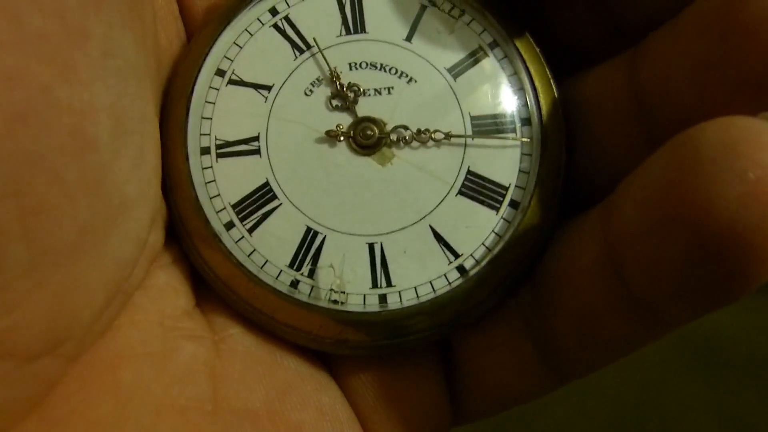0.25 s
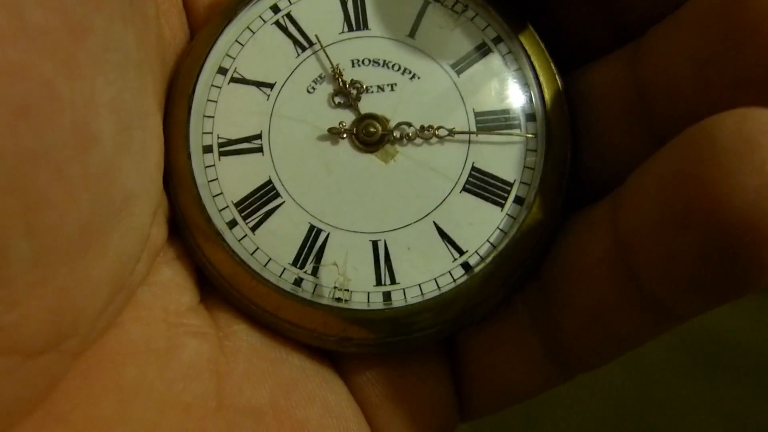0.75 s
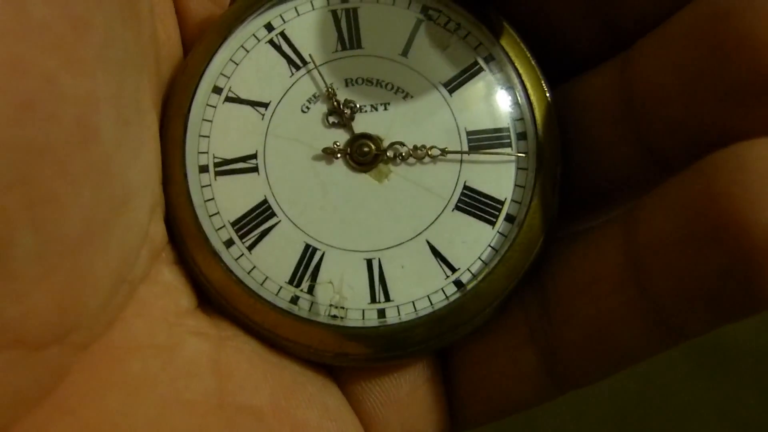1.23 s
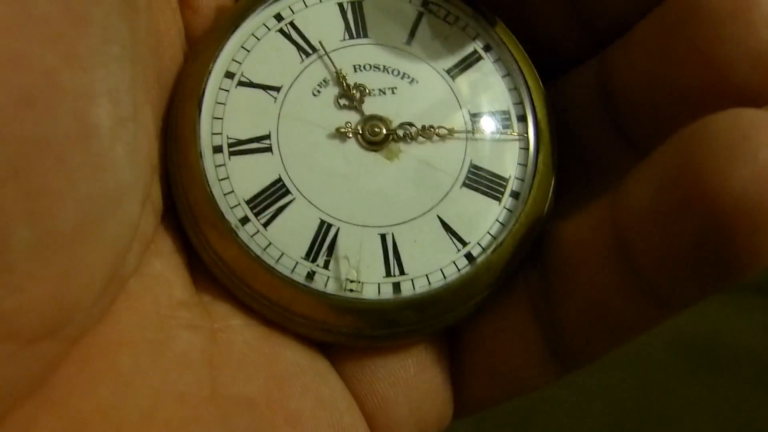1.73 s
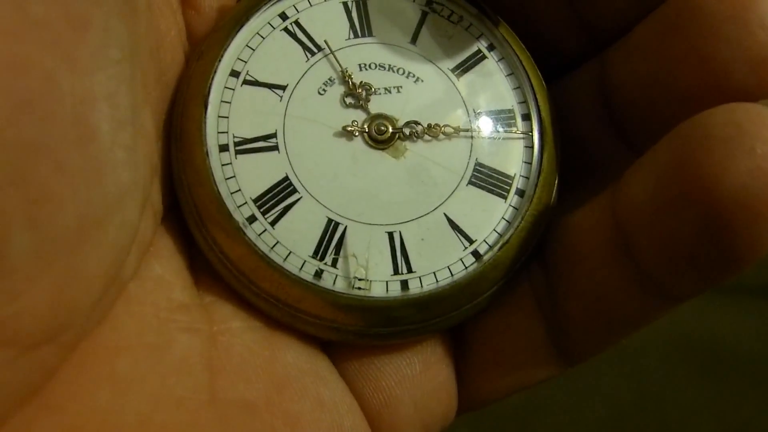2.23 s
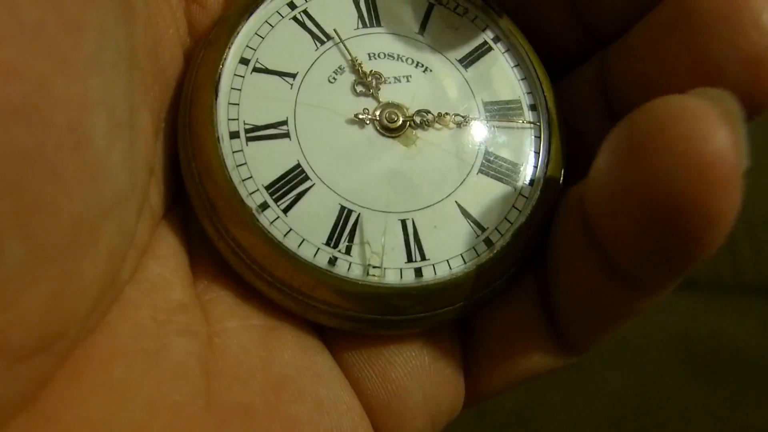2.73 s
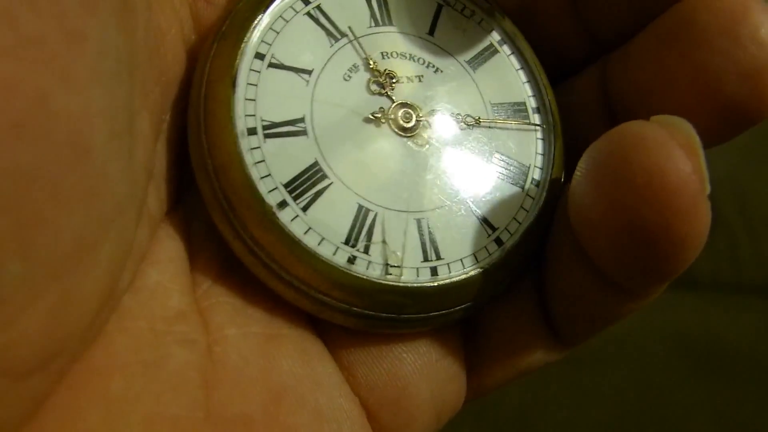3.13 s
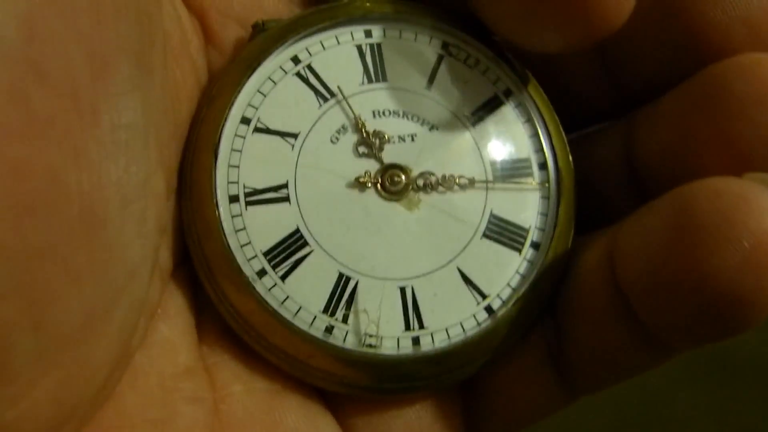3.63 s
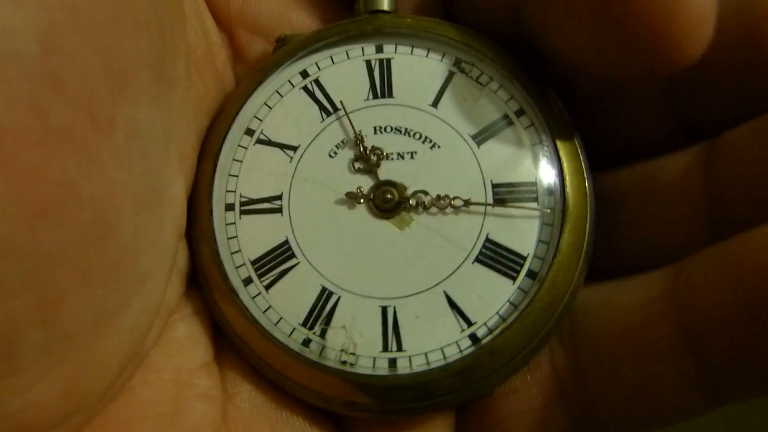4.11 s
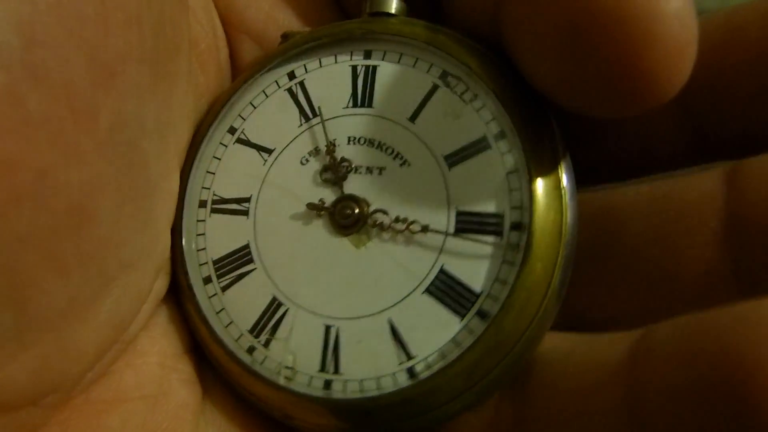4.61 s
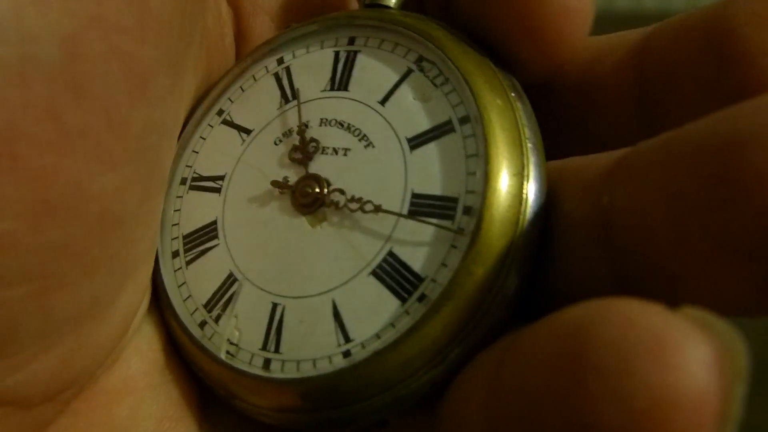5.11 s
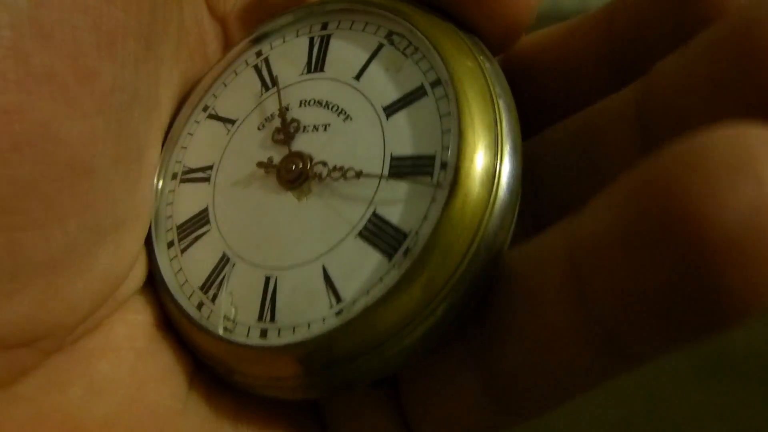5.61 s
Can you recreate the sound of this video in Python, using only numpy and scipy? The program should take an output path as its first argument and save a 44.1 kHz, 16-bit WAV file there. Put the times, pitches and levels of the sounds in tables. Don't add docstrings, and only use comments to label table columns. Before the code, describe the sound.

Crisp metallic watch ticking, almost five beats a second, over soft hiss and very faint distant clocks, after one sharp opening click.

```python
import sys
import numpy as np
from scipy import signal
from scipy.fft import rfft, irfft
from scipy.io import wavfile

SR = 44100
rng = np.random.default_rng(int(sys.argv[2]) if len(sys.argv) > 2 else 0)


def volts(x):
    e = np.asarray(x, float) / 20
    return 10 ** e


def to_wav(s):
    ch = np.atleast_2d(s).T
    pcm = np.round(np.clip(ch, -1, 1) * 32767)
    wavfile.write(sys.argv[1], SR, pcm.astype(np.int16))


N = 258426
MIDDLE_S = N / SR / 2
LEFT_RIGHT = np.array([[1.], [-1.]])

# (pitch [Hz], level [dB], time to fall 60 dB [s])
BACK_TONES = [(2371, -0.6, 0.012), (2350, -15, 0.014)]
# (share of the lid pitch [ratio], level [dB], time to fall 60 dB [s])
LID_TONES = [(1.0023, 2, 0.013), (1.04, -9.5, 0.015), (.96, -13.5, 0.029), (1.19, -19, 0.012)]
# (pitch [Hz], level [dB], time to fall 60 dB [s])
PLATE_TONES = [(4738, -2.5, 0.013), (4904, -9.5, 0.0099), (5340, -16, 0.01), (5720, -18, 0.02),
               (3676, -17.5, 0.0068), (4730, -31.5, 0.24)]
# (pitch [Hz], time to fall 60 dB [s], level on unlock [dB], on push [dB], on drop [dB])
STEEL_TONES = [(6540, 0.013, -6, -2.6, -13.5), (7140, 0.0041, 0, -5.5, -6), (7570, 0.0096, -6.5, -12, -5),
               (8210, 0.0095, -11, -22.5, -15), (8950, .01, -19, -13, -14), (10900, 0.015, -39, -16, -22.5),
               (12500, 0.0059, -24, -28, -34), (14800, .004, -26, -24, -36)]
# (build-up [s], left leads [rad], left minus right [dB], spread of both from blow to blow [0-1])
PART_PATHS = [
    (0.00052, 0.31, -0.3, 0),
    (0.00063, 0.51, 2, 0.03),
    (0.00086, 0.21, -1.5, 0.56),
    (0.00028, -0.37, -1, 0.51),
]
# (pitch [Hz], level [dB], time to fall 60 dB [s])
HAND_AIR_TONES = [(1547, -47.5, 0.03)]

# (drop time [s], unlock level [dB], lid [dB], plates [dB], steel [dB])
TICK_BEATS = [(0.1952, 0.5, 5.5, 1, 0), (0.6084, -0.5, -2.5, -1.0, 2.5), (1.0219, 2.5, -2.5, 1.5, -2.5),
              (1.4354, -0.5, -2.0, 2, 2), (1.8475, -2.5, -0.0, 0, 6.5), (2.2609, 5.5, -0.5, -0.5, -2),
              (2.6729, -0.0, 2.5, -4.0, 1.5), (3.0859, 4, 3, -1.5, -2), (3.5, -5.5, -0.5, -1.5, -1.5),
              (3.9122, -4.5, 0.0, 1.0, -5), (4.3247, -2.5, -6.5, 3, -2.5), (4.7376, 1, 0.5, 1.0, -2),
              (5.1509, 0.5, 0.0, 1, 1.5), (5.5633, 5.0, -1.5, 2.5, 5)]
# (drop time [s], unlock level [dB], lid [dB], plates [dB], steel [dB])
TOCK_BEATS = [(0.0005, 0.0, 0.0, 0.5, -4), (0.408, 4.5, 2.5, -3.5, 2), (0.8231, 1, 2.5, 2, -1),
              (1.235, -4, 0, 6.5, -2), (1.6491, -1.5, 0.5, -1.5, 1.0), (2.0622, 1, -2, -7, -1.0),
              (2.4761, -1.5, 4.5, -1.5, -0.5), (2.8887, -1, 5, -0.5, -1), (3.3026, 1.5, 4.0, -3, 0.5),
              (3.715, 0.5, -1.0, -0.5, 2.5), (4.1276, 1, -11, -0.0, 0.5), (4.541, 1, -5.5, 0.5, -3.5),
              (4.9549, 1, 2, 6, 1.5), (5.366, 0.5, 1, 5, -1), (5.7789, -0.5, -6.0, -6, -0.5)]
# (back [dB], lid [dB], plates [dB], steel [dB], lid pitch [Hz])
TICK_KNOCKS = [
    (-43.5, -34, -37, -44, 2700),
    (-38, -49, -34.5, -33, 2740),
    (-29.5, -25, -22.5, -22, 2693),
]
# (back [dB], lid [dB], plates [dB], steel [dB], lid pitch [Hz])
TOCK_KNOCKS = [
    (-45, -41.5, -36, -43, 2770),
    (-32.5, -37, -31, -35.5, 2690),
    (-37.5, -34, -26, -23.5, 2726),
]
# (at the start [ms], growth [ms per s], share left at the push [ratio])
TICK_LIFT_TIMES = (19.1, .57, .285)
# (at the start [ms], growth [ms per s], share left at the push [ratio])
TOCK_LIFT_TIMES = (18.9, 1.0, .33)
# (unlock [dB], push [dB], drop [dB])
TICK_CRACKS = (-2, 1, -1.5)
# (unlock [dB], push [dB], drop [dB])
TOCK_CRACKS = (-1, -11, -2.5)
GRIP_SHARES = (0.48, .4)
# (time after the drop [s], level [dB])
CHATTER = [
    (.0068, -19),
    (0.011, -26),
    (0.0173, -30),
]

# (pitch
# [Hz], level [dB], time to fall 60 dB [s])
SNAP_TONES = [(920, -28, .02), (1190, -23, .014), (1440, -24.5, .02), (1880, -23, 0.01),
              (2345, -12.5, .018), (2610, -6.3, 0.02), (3130, -20, 0.0069), (3690, -22, 0.0094),
              (4300, -23, .008), (4820, -19.5, 0.01), (6200, -21.5, 0.0089), (6950, -17, .008),
              (7560, -12.5, .012), (8900, -23.5, .008),
              (9480, -27, .008), (11000, -27, .009), (11700, -27.5, .009), (12600, -32, .008),
                    (14900, -35, .006)]
# (pitch [Hz], level [dB], time to fall 60 dB [s])
SLIP_TONES = [(2618, 0.5, .016), (2360, -3, .014), (4840, -4, 0.016), (8200, -16.5, .012)]
# (time [s], level [dB])
SLIP_TIMES = [
    (0.0397, -13.5),
    (.0443, -27),
    (0.0487, -31),
]

# (first tick [s], period [s], strong swing [dB], weak swing [dB])
WALL_SWINGS = (.174, .9991, -53, -58.5)
# (pitch [Hz], width [Hz], level [dB])
WALL_TONES = [(487, 390, -0.5), (670, 230, .5), (1113, 240, -3), (1390, 310, -4), (1683, 96, 1),
              (2230, 460, -6), (4000, 340, -8), (4900, 440, -5)]
# (first tick [s], period [s], strong swing [dB], weak swing [dB])
SHELF_SWINGS = (.153, .7395, -56.5, -62.5)
# (pitch [Hz], width [Hz], level [dB])
SHELF_TONES = [(950, 460, -0.5), (1350, 220, 4.5), (1740, 350, 1.5), (2270, 490, 2.5), (2780, 480, 4),
               (3880, 580, -1), (4500, 460, -4), (6010, 800, -1), (8800, 1000, -1)]
# (first beat [s], period [s])
FAR_WATCH_BEATS = [(.021, .4), (.221, .4), (.354, .4178), (.137, .4181)]
FAR_WATCH_DB = [-60, -68, -61, -60.5]
# (pitch [Hz], width [Hz], level [dB])
FAR_WATCH_TONES = [
    [(6050, 85, -4), (6570, 300, -6.5), (5520, 300, -2.5), (7500, 900, -5.5)],
    [(6100, 74, -2.2), (6900, 600, -9.5), (8100, 970, -4)],
    [(3193, 210, 1), (6500, 300, -1.5), (4940, 570, 0.5), (7670, 900, 4.5)],
    [(5510, 140, -0.5), (6500, 500, 1), (8100, 900, 3), (8940, 270, -1.5)],
]

# (pitch [Hz], level [dB])
ROOM_TREBLE = [(2000, -1), (4700, 0.5), (7500, -0.5), (12000, 0.5), (15000, -4)]
# (pitch [Hz], side minus middle [dB])
STEREO_WIDTH = [(60, -7.5), (110, -4.5), (200, 3.5), (380, 9.5), (700, 7.5), (1290, 3), (2380, -2),
                (4400, -5), (8120, -5.5), (15000, -4)]
# (pitch [Hz], level [dB per Hz])
HISS_COLOUR = [(12, -29), (25, -1), (60, -4), (150, -3.5), (216, -5), (485, -7), (759, -6.5), (1060, -8.5),
               (1710, -8.5), (2990, -14.5), (5080, -11), (5850, -11), (6360, -12), (9950, -14.5),
               (16000, -32)]
# (pitch [Hz], level [dB])
HISS_DIP = [(3000, 0), (3500, 0), (4200, -3), (4600, 0)]


def watch():
    out = np.zeros((2, N))
    for row in TICK_BEATS:
        beat(out, row, TICK_KNOCKS, TICK_LIFT_TIMES, TICK_CRACKS, 1)
    for row in TOCK_BEATS:
        beat(out, row, TOCK_KNOCKS, TOCK_LIFT_TIMES, TOCK_CRACKS, 2.1)
    return out


def beat(out, row, knocks, lift, cracks, back_fall_db_s):
    drop_s, unlock_db, *free_db = row
    lift_ms, growth, push_share = lift
    lift_s = (lift_ms + growth * drop_s) / 1000
    back_db = -0.46 * free_db[0] - back_fall_db_s * (drop_s - MIDDLE_S)
    grip_db = np.array([back_db, *free_db])
    air_db = 3.5 - 1.26 * drop_s - (1 - 0.28) * free_db[-1]

    unlock_share, push_grip_share = GRIP_SHARES
    push_db = push_grip_share * grip_db - 0.7 * (drop_s - MIDDLE_S)
    blows = ((drop_s - lift_s, unlock_db + unlock_share * grip_db),
             (drop_s - push_share * lift_s, push_db),
             (drop_s, grip_db))
    for kind, (at_s, blow_db) in enumerate(blows):
        *usual_db, lid_hz = knocks[kind]
        crack_db = cracks[kind] + air_db
        steel = [(hz, dbs[kind] + air_db * (hz > 10000), t60) for hz, t60, *dbs in STEEL_TONES]
        if at_s > 0:
            start_s = max(at_s - 0.0005, 0)
            add(out, start_s, contact(steel, usual_db + blow_db, lid_hz, crack_db))

    add(out, drop_s, ring(HAND_AIR_TONES, 0.0018, lead=0.84))
    for late_s, db in CHATTER:
        add(out, drop_s + late_s, contact(steel, usual_db + grip_db + db, lid_hz, crack_db))


def contact(steel, part_db, lid_hz, crack_db):
    lid = [(share * lid_hz, db, t60) for share, db, t60 in LID_TONES]
    parts = (BACK_TONES, lid, PLATE_TONES, steel)
    rings = sum(volts(db) * ring(tones, *path) for tones, db, path in zip(parts, part_db, PART_PATHS))
    return rings + volts(part_db[-1] + crack_db) * crack(rings.shape[1])


def ring(tones, rise_s, lead=0, pan_db=0, spread=0, detune=0.012, scatter_db=1.5, scatter_rad=1.38,
         turn_rad=0):
    t = np.arange(4000) / SR
    hz, db, t60 = np.transpose(tones)[:, :, None]
    chance = rng.standard_normal((len(tones), 5)).T[:, :, None]
    side = LEFT_RIGHT[:, :, None] / 2
    phase = 2 * np.pi * hz * (1 + detune * chance[0]) * t
    phase = phase + scatter_rad * chance[1] + turn_rad * np.arange(len(tones))[:, None]
    phase = phase + side * (lead + spread * chance[3])
    gain = volts(db + scatter_db * chance[2] + side * (pan_db + 5.7 * spread * chance[4]))
    decay = np.exp(-np.log(1000) * t / t60) * (1 - np.exp(-t / rise_s)) ** 2
    peak = np.max(decay, axis=1, keepdims=True)
    return (gain * np.sin(phase) * decay / peak).sum(axis=1)


def crack(count):
    t = np.arange(count) / SR
    dull = signal.butter(2, 7950, fs=SR, output="sos")
    noise = signal.sosfilt(dull, np.diff(rng.standard_normal((2, count + 1))))
    burst = np.exp(-t / 0.0018)
    rattle = volts(-25) * np.exp(-t / 0.008)
    rise = 1 - np.exp(-t / 0.00041)
    return (noise[0] + 0.27 * noise[1] * LEFT_RIGHT) * (burst + rattle) * rise


def nail():
    out = np.zeros((2, N))
    snap_s = 0.0363
    blows = [(snap_s, 0, SNAP_TONES)]
    blows += [(s, db, SLIP_TONES) for s, db in SLIP_TIMES]
    for s, db, tones in blows:
        sound = ring(tones, 0.0005, lead=0.45, pan_db=0.8, spread=0.1, detune=0, scatter_db=0)
        add(out, s, volts(db) * sound)
    add(out, snap_s, volts(-17) * crack(count=4000))
    return out


def clock(ticks, body, t60):
    knocks = np.zeros((2, N))
    tones = [(hz, db, np.log(1000) / np.pi / width) for hz, width, db in body]
    for s, db in ticks:
        knock = ring(tones, 0.00024, spread=0.46, scatter_db=0.8, scatter_rad=0.41, turn_rad=np.pi)
        add(knocks, s, volts(db + 17.5) * knock)
    return volts(-12.5) * knocks + reverb(knocks.mean(axis=0), t60, build_s=0.01)


def swings(first_s, period_s, strong_db, weak_db):
    count = int((N / SR - first_s) / period_s) + 1
    return [(first_s + k * period_s, (strong_db, weak_db)[k % 2]) for k in range(count)]


def far_watches():
    out = np.zeros((2, N))
    for (first_s, period_s), db, body in zip(FAR_WATCH_BEATS, FAR_WATCH_DB, FAR_WATCH_TONES):
        ticks = [(s, db) for s in np.arange(first_s, N / SR, period_s)]
        out += clock(ticks, body, t60=0.17)
    return out


def reverb(x, t60, build_s=1e-4):
    t = np.arange(SR // 2) / SR
    fade = np.exp(-np.log(1000) * t / t60) * (t > 0.0013)
    tails = rng.standard_normal((2, len(t))) * fade * np.sqrt(1 - np.exp(-t / build_s))
    mid, side = (signal.fftconvolve(x, tail / np.sqrt(np.sum(tail ** 2)))[:N] for tail in tails)
    return mid + shape(side, STEREO_WIDTH) * LEFT_RIGHT


def hiss():
    mid, side = (shape(shape(rng.standard_normal(N), HISS_COLOUR), HISS_DIP) for _ in range(2))
    return volts(-55.8) / mid.std() * (mid + shape(side, STEREO_WIDTH) * LEFT_RIGHT)


def shape(x, points):
    hz, db = np.transpose(points)
    bins = np.maximum(np.arange(N // 2 + 1) * SR / N, 1)
    return irfft(rfft(x, N) * volts(np.interp(np.log(bins), np.log(hz), db)), N)


def add(out, s, sound):
    i = int(s * SR)
    out[..., i:i + sound.shape[-1]] += sound[..., :N - i]


def scene():
    ticks, snap = watch(), nail()
    into_room = (ticks + volts(2) * snap).mean(axis=0)
    room = volts(-19.5) * reverb(shape(into_room, ROOM_TREBLE), t60=0.38)
    wall_clock = clock(swings(*WALL_SWINGS), WALL_TONES, t60=0.46)
    shelf_clock = clock(swings(*SHELF_SWINGS), SHELF_TONES, t60=0.44)
    return ticks + snap + room + wall_clock + shelf_clock + far_watches() + hiss()


def roll_off(x):
    return signal.sosfilt(signal.butter(12, 16000, fs=SR, output="sos"), x)


def record(dry):
    limit = 1.5
    rounded = limit * np.tanh(dry / limit)
    top_cut = signal.cheby2(12, 30, 16050, fs=SR, output="sos")
    finished = signal.sosfilt(top_cut, rounded)
    return roll_off(finished)


dry = scene()
out = record(dry)
to_wav(out)
```